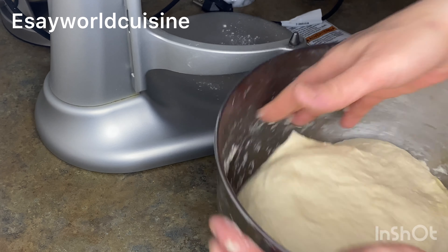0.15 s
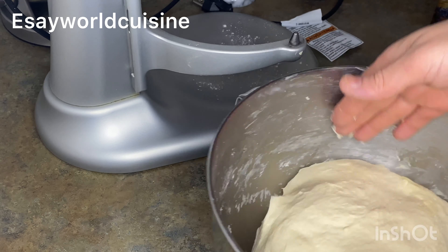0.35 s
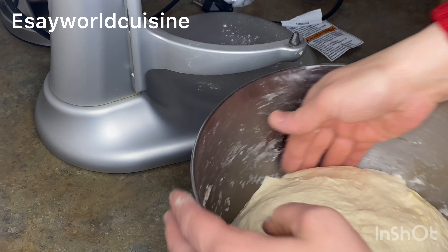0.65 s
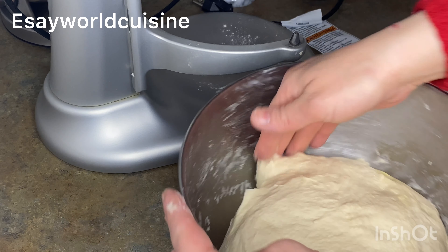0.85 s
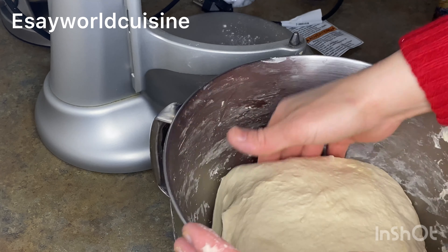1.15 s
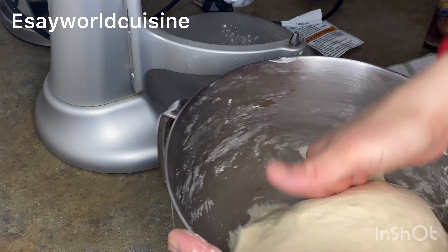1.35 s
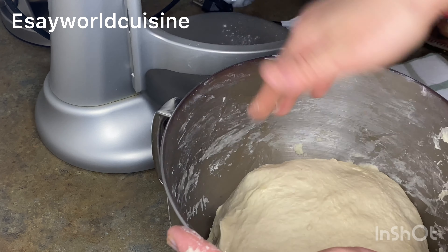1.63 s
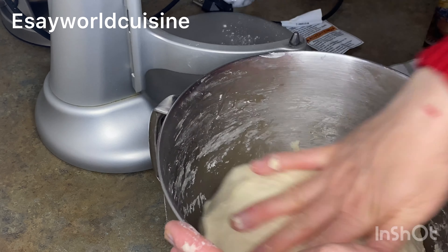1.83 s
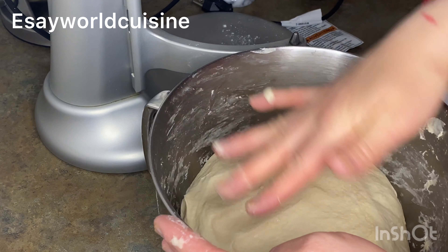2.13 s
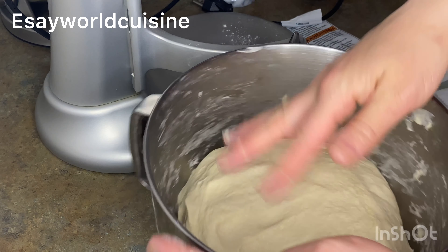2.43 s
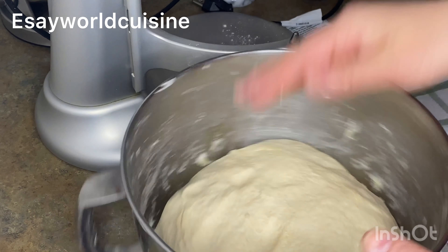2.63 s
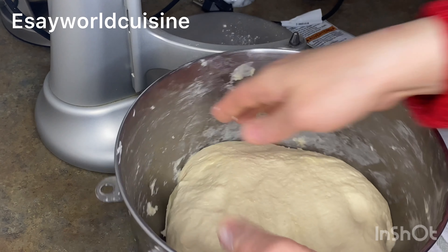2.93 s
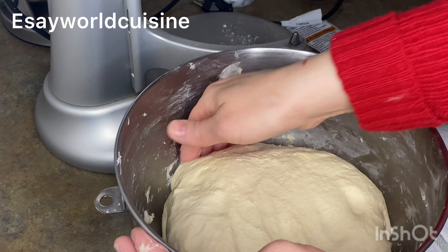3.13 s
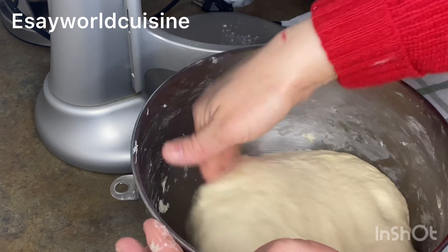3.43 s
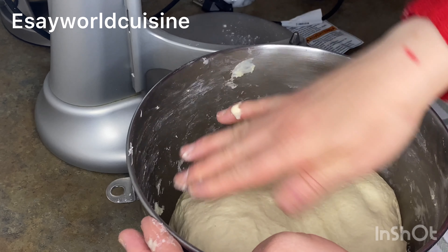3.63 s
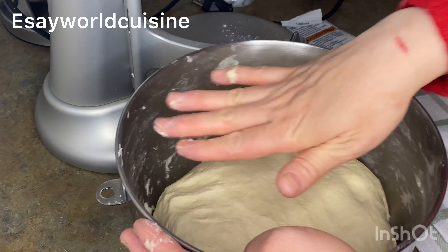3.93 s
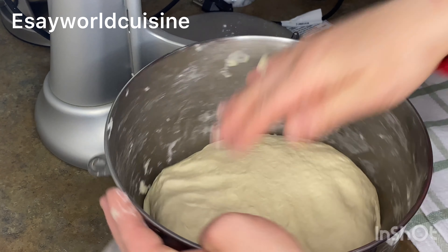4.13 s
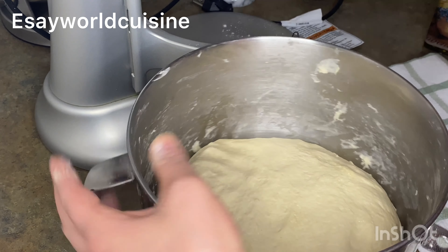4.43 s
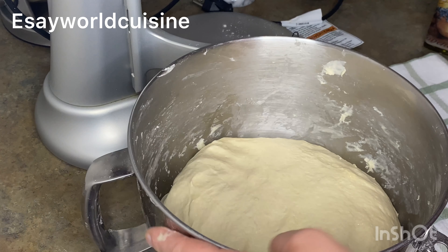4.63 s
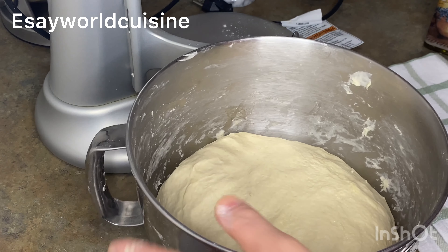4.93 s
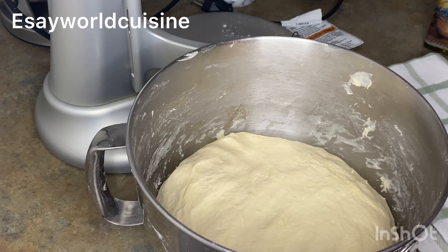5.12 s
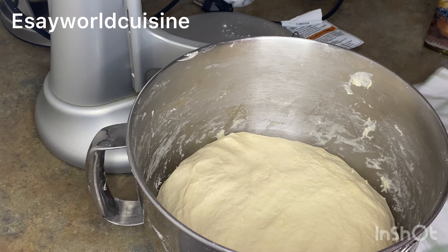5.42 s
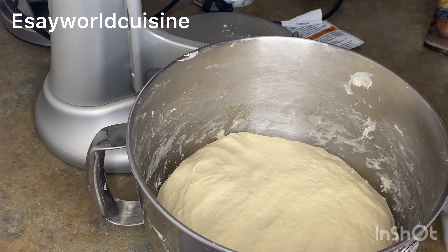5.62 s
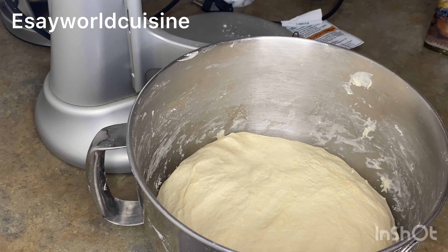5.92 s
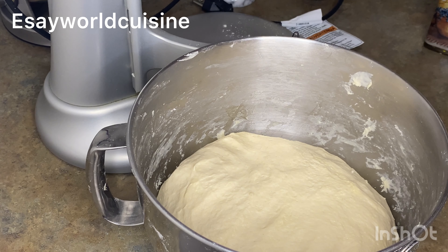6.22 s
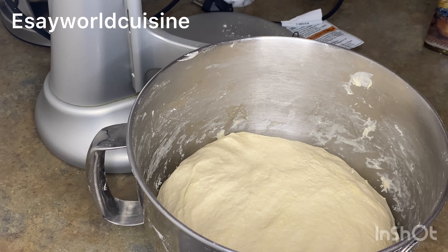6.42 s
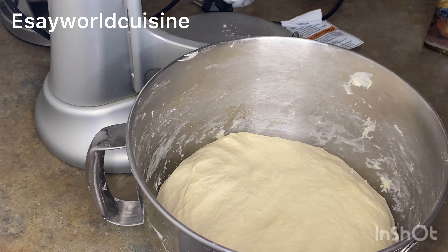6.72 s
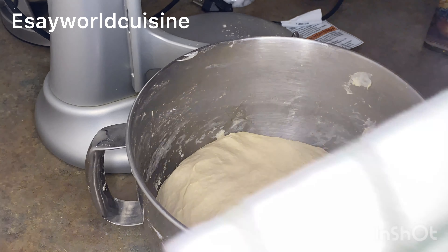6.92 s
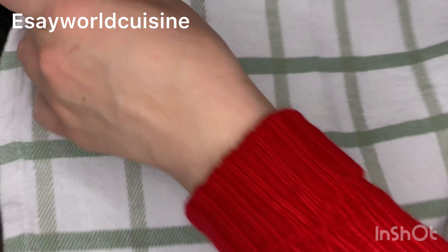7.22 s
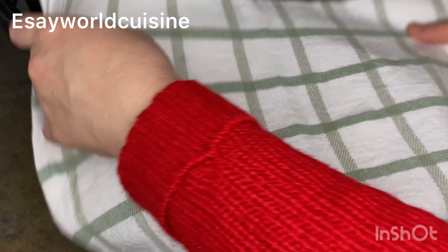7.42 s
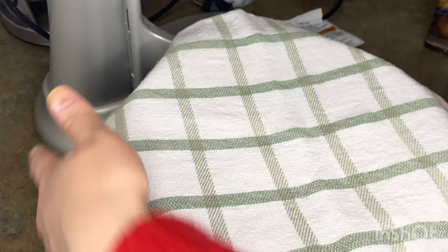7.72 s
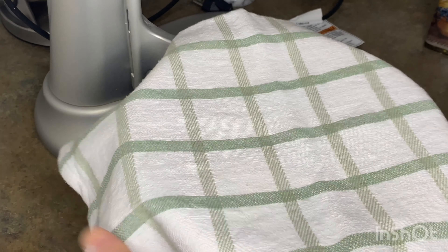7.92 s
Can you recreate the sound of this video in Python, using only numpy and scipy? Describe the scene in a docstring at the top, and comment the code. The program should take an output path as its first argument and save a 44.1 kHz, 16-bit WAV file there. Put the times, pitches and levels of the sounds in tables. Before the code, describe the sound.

Dough is slapped and tucked in a heavy mixing bowl, picked up by a nearby phone. The first slap is loudest, with a short damped metal ring; the bowl foot then bumps the counter in quick dull knocks. Sparse pats and skin rustles lead to a second burst of thuds, a few crisp light touches, then only tiny scuffs and soft cloth movement over steady bass rumble.

```python
"""On a kitchen counter, hands pat and tuck dough in a steel bowl that rocks and knocks; then a towel is
spread over it. Each slap is a burst of contact noise that rings the bowl's modes; cupped air pops out.
Each bump of the foot sends a bending wave through the counter top, whose treble arrives before its boom.
Skin and cloth rustle and scuff as shaped noise over a quiet kitchen rumble, close to a phone."""
import sys
import numpy as np
from scipy import signal
from scipy.fft import rfft, irfft, next_fast_len
from scipy.io import wavfile
from scipy.ndimage import uniform_filter1d

SR = 44100
rng = np.random.default_rng(int(sys.argv[2]) if len(sys.argv) > 2 else 0)


def store_wav(level_fs):
    """Save 16-bit WAV to argv[1]."""
    pcm = np.round(np.clip(np.atleast_2d(level_fs), -1, 1) * 32767)
    wavfile.write(sys.argv[1], SR, pcm.T.astype(np.int16))


N = 355426  # length in samples

# Slaps and knocks with a sharp start. Each row: start in seconds, slap level in dB, dullness in dB an
# octave, contact in ms, air pocket in Hz, bowl body level in dB, bowl rim level in dB.
SLAP_EVENTS = [(0.015, -18, 5, 18, 2070, -11, -40), (0.029, -24.5, 7, 13.2, 543, -16.5, -42),
               (0.3, -45.5, 4.5, 16.4, 780, -57, -71), (.331, -48.5, 3, 12, 666, -47, -42),
               (0.379, -50, 0.5, 19, 794, -76, -60), (0.4233, -52, 5, 12.6, 844, -58, -65),
               (.712, -81, 4.5, 16, 498, -56, -59), (0.7936, -57, -2.5, 4.8, 1000, -60, -63),
               (1.074, -45, 2.5, 7.3, 1330, -63, -76), (1.117, -53.5, 9.5, 3.1, 3476, -70, -75),
               (1.503, -41, 1.5, 9.6, 830, -65, -29), (1.793, -62.5, 9, 7.1, 1005, -69.5, -62.5),
               (1.85, -34, -23, 1.8, 3004, -83, -82), (2.2018, -50, 1.5, 5.3, 993, -64, -72),
               (2.5151, -59.5, 0, 8.4, 1490, -64, -71.5), (2.596, -46, 6.5, 15.9, 778, -69, -62),
               (2.657, -43, 7.5, 8.9, 650, -66, -60.5), (2.683, -48, 8, 10, 809, -48.5, -45),
               (3.176, -48, -13, 4.5, 2010, -59, -71), (3.198, -50, -7.5, 4.4, 2000, -77, -85.5),
               (3.2396, -48, -11, 2.4, 3050, -73, -65.5), (3.319, -63.5, 2.5, 3, 2950, -77.5, -76),
               (3.458, -51, 11, 5.3, 798, -55.5, -76), (3.693, -42, 0, 4.7, 740, -66, -73),
               (3.698, -39, 3, 3.1, 596, -62, -62), (3.9858, -56.5, 5, 5.6, 1007, -73, -53.5),
               (7.318, -51, 5.5, 9.46, 784.5, -61, -88)]
# Colour of a slap. Each row: frequency in Hz, level in dB.
SLAP_COLOUR = [(150, -19.5), (400, -15), (900, -3), (1300, -6.5), (2000, 0), (3000, -1.5), (7200, -0.5),
               (8600, -5.5), (11000, -9.5), (16000, -13)]
# Modes of the bowl body, damped by the dough. Each row: frequency in Hz, level in dB, t60 in seconds.
BOWL_MODES = [(478, -1, .07), (523, -3, .1), (588, -4, .07), (683, -4, .1), (795, -8, .1), (962, -3, .09),
              (1028, -3, .08), (1085, -1, .11), (1222, -8, .1), (1407, -4, .09), (1520, -6, .08),
              (2071, -3, .06), (2200, -6, .11), (2563, -6, .11), (3150, -10, .07), (4100, -13, .06),
              (4926, -11, .09), (5980, -17, .08)]
# Modes of the free rim. Each row: frequency in Hz, level in dB, t60 in seconds.
RIM_MODES = [(524, 3, 0.065), (885, -7, 0.03), (975, -16, .2), (1525, -10, .05), (2562, -4, .075),
             (2439, -17, .08), (4590, -14, 0.03)]
SPOT_DB = 3.0  # spread of mode strengths from one place of contact to the next
STRIKE = 1.3  # strength of the first touch on the bowl against the rest of the contact


def slaps():
    """A burst of contact noise coloured by the air pocket under the hand; it also rings the bowl."""
    out = np.zeros(N)
    t = np.arange(4096) / SR
    hz = np.fft.rfftfreq(len(t), 1 / SR)
    fade = signal.windows.tukey(len(t), 0.1)
    wall = tones(np.vstack([BOWL_MODES, clatter()]), 0, 0.72)
    rim = ring(tones(RIM_MODES, 0, 0.93))
    lead_in = 200  # samples of room for the colouring filter ahead of the touch
    for s, slap_db, dull_db, ms, pocket_hz, body_db, rim_db in SLAP_EVENTS:
        u = t * 1000 / ms
        press = np.minimum(u / 0.23, 1) * np.exp(-u ** 1.9)
        contact = rng.standard_normal(len(t)) * press

        # the air pocket lifts the bands around its tone and its octave
        pocket_db = sum(13.0 / k / (1 + ((hz - k * pocket_hz) / 190.0) ** 2) for k in (1, 2))
        tilt_db = -dull_db * np.log2((hz + 50) / 3000)
        colour = gain_of(read(SLAP_COLOUR, hz) + tilt_db + pocket_db)
        treble = np.sqrt(np.mean(colour[hz > 1500] ** 2))
        slap = irfft(rfft(np.roll(contact, lead_in)) * colour) * fade / treble
        add(out, s - lead_in / SR, gain_of(slap_db) * slap)

        # each place of contact favours other modes
        body = ring(wall, SPOT_DB * rng.standard_normal(len(wall)))
        push = np.r_[STRIKE * np.linalg.norm(contact), contact]
        body = signal.oaconvolve(body, push)
        add(out, s, gain_of(body_db) * body / abs(body).max())
        add(out, s, gain_of(rim_db) * rim)
    return out


def clatter(count=110):
    """The many lesser wall modes of the bowl, weaker towards the treble."""
    place = (np.arange(count) + rng.random(count)) / count
    hz = 450 * (7000 / 450) ** place
    level_db = -12.5 - 4.0 * np.log2(hz / 450)
    t60 = np.full(count, 0.08)
    return np.transpose([hz, level_db, t60])


# Air trapped under a cupped hand pops out. Each row: start in seconds, tone in Hz, length in ms, level in dB.
POP_EVENTS = [(0.301, 644, 15.5, -36.5), (1.076, 710, 9.1, -53.5), (1.792, 987, 8, -61),
              (2.201, 1012, 7.4, -53.5), (3.458, 813, 7.13, -34.5), (3.987, 1000, 7, -52.5),
              (7.318, 792, 10.2, -51)]
POP_OCTAVE_DB = -13.5  # octave against the tone


def pops():
    """A few cycles of the air pocket's tone and its octave, swelling and fading."""
    out = np.zeros(N)
    for s, hz, ms, db in POP_EVENTS:
        t = np.arange(0, ms / 1000, 1 / SR)
        octave = gain_of(POP_OCTAVE_DB) * np.sin(2 * np.pi * 2 * hz * t)
        tone = np.sin(2 * np.pi * hz * t) + octave
        add(out, s, gain_of(db) * tone * np.sin(np.pi * t / t[-1]))
    return out


# The bowl foot bumps the counter. Each row: start in seconds, knock level in dB, boom level in dB.
BUMP_EVENTS = [(0.022, -30.5, -39.5), (0.2991, -22, -28), (0.313, -46, -18), (0.333, -18.5, -19),
               (0.385, -28.5, -22), (0.4245, -19, -18.5), (0.653, -54, -47), (0.7146, -43, -37),
               (1.076, -29, -26), (1.086, -57.5, -20), (1.472, -53, -73), (1.504, -36.5, -55.5),
               (1.792, -57.5, -54), (1.946, -51.5, -75), (2.203, -43, -50.5), (2.365, -52.5, -64),
               (2.597, -19.5, -14.5), (2.658, -16.5, -18.5), (2.678, -17, -12), (3.03, -64, -41),
               (3.052, -58, -42.5), (3.112, -53.5, -54), (3.346, -53.5, -50.5), (3.4592, -42, -51),
               (3.48, -38, -57), (3.511, -44, -37.5), (3.693, -38.5, -53), (3.962, -49, -40.5),
               (3.986, -37, -34.5), (4.189, -58, -82), (4.37, -55.5, -58), (4.417, -76, -45.5),
               (4.654, -63, -52), (4.703, -62.5, -54.5), (4.879, -71.5, -55), (5.151, -58.5, -56.5),
               (5.68, -77, -61), (6.367, -52.5, -57.5), (7.19, -58, -60), (7.32, -43.5, -59),
               (7.379, -49, -54.5), (7.486, -54.5, -61.5), (7.64, -80, -54.5), (8.046, -49, -57)]
# Upper modes of the counter top. Each row: frequency in Hz, level in dB, t60 in seconds.
KNOCK_MODES = [(160, -11, .05), (213, -18, .04), (268, 1, .09), (301, 1, .085), (348, -4, .06),
               (423, -3, .08), (465, -5, .055), (520, -8, .05), (589, -10, .05), (640, -14, .05),
               (748, -16, .04), (810, -18, .05)]
# Lowest modes of the counter top. Each row: frequency in Hz, level in dB, t60 in seconds.
BOOM_MODES = [(65.4, -24, 0.17), (89, -11.5, 0.02), (96, 0, 0.11), (144, -13.5, 0.05), (138, -13.5, 0.1)]
SOFTENING = 0.13  # a weaker bump is duller: dB an octave for each dB of knock
TRAVEL = 0.07  # bending waves arrive after this many seconds divided by the root of their Hz
LANDING = 14.0  # strength of the first touch against the chatter after it


def bumps():
    """Bending waves in the counter: the knock modes come first, the boom swells later."""
    knocks, booms = np.zeros((2, N))
    octaves = np.log2(np.transpose(KNOCK_MODES)[0] / 300)
    slab = tones(KNOCK_MODES, TRAVEL, 0.3)
    boom = ring(tones(BOOM_MODES, TRAVEL, 1.5))
    chatter_fade = np.exp(-np.arange(600) / SR / 0.003)  # the round foot chatters as it lands
    for s, knock_db, boom_db in BUMP_EVENTS:
        spot_db = SPOT_DB * rng.standard_normal(len(slab))
        chatter = chatter_fade * rng.standard_normal(600)
        knock = ring(slab, spot_db + SOFTENING * knock_db * octaves)
        knock = signal.oaconvolve(knock, np.r_[LANDING, chatter])
        add(knocks, s, gain_of(knock_db) * knock / abs(knock).max())
        add(booms, s, gain_of(boom_db) * boom)
    return knocks, booms


# Fingers or cloth scuff the steel or the counter. Each row: start in seconds, length in seconds,
# centre in Hz, width in Hz, level in dB.
SCUFF_EVENTS = [(0.48, 0.071, 4640, 303, -69), (1.878, 0.16, 2494, 1195, -73.5),
                (2.34, 0.045, 1995, 250, -72.5), (2.998, 0.14, 3720, 594, -63),
                (3.026, 0.17, 4710, 410, -70), (3.427, 0.069, 787, 886, -60),
                (3.458, 0.025, 4370, 700, -56.5), (3.778, 0.13, 396, 699, -66.5),
                (4.369, 0.086, 285, 38.7, -58), (4.389, 0.047, 4040, 608, -67),
                (4.391, 0.093, 617, 59.8, -72), (4.399, 0.046, 1676, 148, -71.5),
                (4.857, 0.11, 344, 346, -63), (4.668, 0.024, 4460, 797, -73.5),
                (5.101, 0.05, 401, 1496, -69.5), (5.645, 0.082, 293.6, 302.4, -69.5),
                (6.327, 0.12, 489, 909, -84), (6.786, 0.057, 1485, 2500, -73.5),
                (7.203, 0.065, 1710, 201, -77.5), (7.206, 0.085, 3940, 407, -76),
                (7.322, 0.077, 685, 1770, -63.5), (7.324, 0.052, 4100, 1490, -68)]


def scuffs():
    """Grainy friction noise through one resonance, with a quick start and a fading end."""
    out = np.zeros(N)
    size = 8192
    hz = np.fft.rfftfreq(size, 1 / SR)
    for s, length, centre_hz, width, db in SCUFF_EVENTS:
        hiss, wander = rng.standard_normal((2, size))
        grain = hiss * gain_of(3.5 * evened(uniform_filter1d(wander, size=80)))
        resonance = 1 / (1 + (2 * (hz - centre_hz) / width) ** 2)
        band = evened(irfft(rfft(grain) * resonance))
        u = np.arange(size) / SR / length
        add(out, s, gain_of(db) * band * np.minimum(u / 0.14, 1) * np.exp(-u ** 4))
    return out


# Colour of the swish of skin and cloth. Each row: frequency in Hz, level in dB.
SWISH_COLOUR = [(500, -35.5), (1500, -15.5), (2600, -13), (3600, -8), (5100, -5.5), (7200, -1), (8600, -6),
                (11000, -5), (13000, -6), (15500, -7.5)]
# Colour of the drag on the bowl wall. Each row: frequency in Hz, level in dB.
DRAG_COLOUR = [(300, -11.5), (600, 0.5), (1000, -7.5), (1600, -6.5), (2500, -5.5), (4000, -17.5),
               (8000, -32)]
# How hard the bowl shifts on the counter. Each row: time in seconds, level in dB.
SHIFT_LEVELS = [(0.0, -48), (0.015, -48), (0.035, -45), (0.13, -40), (0.25, -46), (0.36, -27.5),
                (0.49, -42.5), (0.8, -79.5), (1.279, -71.5), (1.429, -56.5), (1.62, -72.5), (2.651, -62),
                (2.74, -37.5), (2.851, -56), (3.159, -56), (3.3, -68), (3.64, -71), (3.9, -61.5),
                (4.42, -64), (4.67, -74), (6.04, -100), (8.06, -89)]


def handling():
    """Hiss of skin and cloth, drag that stirs the bowl modes, small slips that stir the counter."""
    swish_db, drag_db = strokes()
    shift_db = np.interp(np.arange(N) / SR, *np.transpose(SHIFT_LEVELS))

    # slips: noise whose level jumps every 200 samples
    jumps_db = 5.2 * rng.standard_normal((2, N // 200 + 1))
    slips = rng.standard_normal((2, N)) * gain_of(jumps_db.repeat(200, axis=1)[:, :N])
    wall_ring = ring(tones(RIM_MODES[3:] + BOWL_MODES[5:], 0, 0.6))
    wall = evened(signal.oaconvolve(slips[0], wall_ring)[:N])
    counter_ring = ring(tones(KNOCK_MODES, 0, 0.044)) + gain_of(3.5) * ring(tones(BOOM_MODES, 0, 0.14))
    counter = evened(signal.oaconvolve(slips[1], counter_ring)[:N])

    rubbing = noise(SWISH_COLOUR, swish_db, 2.8, 1.6) + noise(DRAG_COLOUR, drag_db, 2.5, 1.5)
    return rubbing + gain_of(drag_db - 9.5) * wall + gain_of(shift_db) * counter


# Strokes of skin or cloth over dough and steel. Each row: start in seconds, length in seconds, swish at
# the start in dB, swish at the end in dB, drag on the bowl wall in dB.
STROKE_EVENTS = [(0.028, 0.18, -52.5, -67, -46), (0.249, 0.048, -70, -53.5, -70),
                 (0.359, 0.17, -65, -58, -75), (0.553, 0.12, -68, -66.5, -75),
                 (0.654, 0.044, -62.5, -53, -75.5), (0.74, 0.13, -64.5, -63.5, -72.5),
                 (0.885, 0.21, -74.5, -64, -105), (1.049, 0.2, -64, -55, -74.5),
                 (1.306, 0.15, -70.5, -65, -79.5), (1.455, 0.017, -72.5, -53, -71),
                 (1.51, 0.045, -56, -65.5, -78), (1.793, 0.016, -69, -81.5, -59),
                 (1.836, 0.17, -68, -58.5, -75), (2.203, 0.017, -59.5, -73, -92.5),
                 (2.298, 0.059, -72.5, -62.5, -85), (2.447, 0.15, -75, -57.5, -86),
                 (2.655, 0.31, -67.5, -75.5, -72), (2.997, 0.1, -58, -54, -76.5),
                 (3.13, 0.36, -65, -64, -70.5), (3.406, 0.039, -74, -55, -76),
                 (3.463, 0.0093, -39.5, -51.5, -88.5), (3.702, 0.0074, -42, -60.5, -88),
                 (3.726, .12, -69, -56.5, -77.5), (3.987, 0.0076, -51.5, -60, -63),
                 (4.022, 0.05, -65.5, -61.5, -68.5), (4.084, 0.14, -72.5, -82.5, -71.5),
                 (4.213, 0.12, -75, -72, -70.5), (4.354, 0.049, -67, -58.5, -73),
                 (4.595, 0.31, -76, -84.5, -95), (4.97, .08, -78.5, -79.5, -86),
                 (5.129, 0.039, -66.5, -63.5, -69), (5.276, .35, -75, -77, -87.5),
                 (5.646, 0.27, -71.5, -71, -83.5), (6.062, 0.3, -70.5, -75.5, -82.5),
                 (6.336, 0.15, -67.5, -69.5, -72.5), (6.497, 0.2, -66, -64.5, -81.5),
                 (6.69, 0.11, -63.5, -54.5, -92), (6.848, 0.38, -67.5, -72, -78.5),
                 (7.068, 0.067, -64, -65, -74.5), (7.205, 0.45, -70.5, -70.5, -82),
                 (7.923, 0.15, -75.5, -73, -88)]
DRAG_FOLLOWS = 0.6  # share of the swish's glide that the drag follows
TOUCH_S = 0.009  # onset in seconds, ending at the stroke's start
LIFT_DB_PER_S = 337  # a stroke dies away as the hand lifts


def strokes():
    """Swish and drag levels in dB: each stroke sets in, glides from first level to last and dies away."""
    t = np.arange(0, N + 64, 64) / SR
    s, length, first_db, last_db, drag_db = np.transpose(STROKE_EVENTS)[:, :, None]
    touch = np.clip((t - s) / TOUCH_S + 1, 1e-4, 1)
    lift = gain_of(-LIFT_DB_PER_S * np.maximum(t - s - length, 0))
    glide_db = (last_db - first_db) * np.clip((t - s) / length, 0, 1)
    both = touch * lift * gain_of([first_db + glide_db, drag_db + DRAG_FOLLOWS * glide_db])
    level_db = 10 * np.log10((both ** 2).sum(axis=1) + 1e-11)  # overlapping strokes add as power
    return [np.interp(np.arange(N) / SR, t, v) for v in level_db]


# How the room dies away. Each row: frequency in Hz, t60 in seconds.
ROOM_DECAY = [(100, 0.5), (500, 0.11), (2000, 0.22), (6000, 0.19), (15000, 0.25)]
ROOM_DB = -5.5


def room(x):
    """Sparse taps of random sign, each band dying at its own speed; the channels share part of the tail."""
    taps = np.zeros((2, SR // 2))
    slots = np.arange(200, SR // 2 - 20, 20)
    at = slots + rng.integers(0, 20, (2, len(slots)))
    np.put_along_axis(taps, at, rng.choice([-1., 1.], at.shape), 1)
    taps[1] = taps[0] + 0.4 * taps[1]
    hz, t, z = signal.stft(taps, SR, nperseg=256)
    decay = gain_of(-60 * t / read(ROOM_DECAY, hz)[:, None])
    tail = signal.istft(z * decay, SR, nperseg=256)[1]
    tail /= np.linalg.norm(tail, axis=1, keepdims=True)
    return signal.fftconvolve(x[None], tail, axes=1)[:, :N]


# Colour of the kitchen rumble. Each row: frequency in Hz, level in dB per Hz.
KITCHEN_COLOUR = [(25, -11), (32, -6), (42, 5), (55, 1), (80, -16.5), (120, -17.5), (250, -23.5),
                  (500, -32), (1000, -39.5), (2500, -46), (4000, -46.5), (7000, -47.5), (15500, -52)]
KITCHEN_DB = -58


def kitchen():
    """Steady rumble: noise strongest in the bass, with only slight patches and flicker."""
    return noise(KITCHEN_COLOUR, KITCHEN_DB, 0.24, 0.48, size=2048)


# Likeness of the channels in diffuse sound. Each row: frequency in Hz, left-right likeness (1 is the same).
LIKENESS = [(60, 0.94), (130, 1), (290, 0.25), (640, 0.18), (1410, 0.25), (3100, .93), (8000, 0.92),
            (15000, 0.6)]


def noise(colour, level_db, patchy_db, flicker_db, size=512):
    """Two channels of random short-time spectra with patches and a flicker shared by all bands."""
    hop = size // 4
    frames, hz = N // hop + 5, np.fft.rfftfreq(size, 1 / SR)
    a, b, c, d, patches = rng.standard_normal((5, len(hz), frames))
    patches = uniform_filter1d(patches, size=5, axis=0)
    patches = evened(uniform_filter1d(patches, size=16, axis=1))
    flicker = evened(uniform_filter1d(rng.standard_normal(frames), size=3))
    same = np.clip(read(LIKENESS, hz), -1, 1)[:, None]
    left = a + 1j * b
    right = same * left + np.sqrt(1 - same ** 2) * (c + 1j * d)
    shape_db = read(colour, hz)[:, None] + patchy_db * patches + flicker_db * flicker
    z = np.array([left, right]) * gain_of(shape_db)
    sound = signal.istft(z, nperseg=size, noverlap=size - hop)[1][:, :N]
    return gain_of(level_db) * evened(sound)


def tones(modes, travel, rise_cycles):
    """Dying sines, one row a mode; each starts when its wave arrives and swells over some cycles."""
    hz, db, t60 = np.transpose(modes)[:, :, None]
    t = np.maximum(np.arange(SR // 3) / SR - travel / np.sqrt(hz), 0)
    swell = 1 - np.exp(-t * hz / rise_cycles)
    return gain_of(db - 60 * t / t60) * swell * np.sin(2 * np.pi * hz * t)


def ring(rows, spread_db=0):
    """Sums the modes, each raised or lowered by spread_db; peak 1."""
    sound = (gain_of(spread_db) * np.ones(len(rows))) @ rows
    return sound / abs(sound).max()


def gain_of(db):
    """Decibels to gain."""
    return 10 ** (np.asarray(db) / 20)


def evened(x):
    """Scales to rms 1."""
    return x / np.sqrt(np.mean(x ** 2) + 1e-20)


def read(points, hz):
    """Joins (Hz, value) points on a log-frequency axis."""
    f, value = np.transpose(points)
    return np.interp(np.log(hz + 1), np.log(f + 1), value)


def add(mix, s, sound):
    """Mixes a sound in at s seconds."""
    part = mix[max(round(s * SR), 0):][:len(sound)]
    part += sound[:len(part)]


def scene():
    """Blows and scuffs with their room tail; the boom, handling and rumble reach the phone directly."""
    knocks, booms = bumps()
    hits = slaps() + pops() + knocks + scuffs()
    wet = hits + gain_of(ROOM_DB) * room(hits)
    return wet + booms + handling() + kitchen()


# Phase between the ports. Each row: frequency in Hz, radians the left port leads.
PORT_LEAD = [(30, .1), (300, .15), (690, 1.), (1380, .2), (4910, .4), (6030, -.5), (7840, .2), (8180, 2.),
             (9220, 1.9), (11600, -.5), (15000, -5)]
# Level between the ports. Each row: frequency in Hz, left minus right in dB.
PORT_BALANCE = [(60, -0.5), (180, -2), (550, -1), (1650, 0), (4970, 0.5), (15000, -1)]
# Overall colour of the sound: bass cut, a narrow gap near 13.4 kHz and a drop above 15.8 kHz.
# Each row: frequency in Hz, level in dB.
OVERALL_COLOUR = [(20, -40), (33, -20), (46, -6), (66, 0), (13050, 0), (13200, -25), (13700, -25),
                  (13800, 0), (15750, 0), (15950, -25)]
EDGE_HZ = 16800  # upper band limit


def record(dry):
    """The two ports differ in phase and level; then the overall colour and the band limit."""
    size = next_fast_len(N + 4096)
    hz = np.fft.rfftfreq(size, 1 / SR)
    # each port takes half of the difference
    half = gain_of(read(PORT_BALANCE, hz) / 2) * np.exp(0.5j * read(PORT_LEAD, hz))
    response = np.array([half, 1 / half]) * gain_of(read(OVERALL_COLOUR, hz))
    ports = irfft(rfft(dry, size) * response, size)[:, :N]
    lowpass = signal.firwin(511, EDGE_HZ, window=("kaiser", 9), fs=SR)
    return signal.oaconvolve(ports, lowpass[None], "same")


dry = scene()
out = record(dry)
store_wav(out)
```